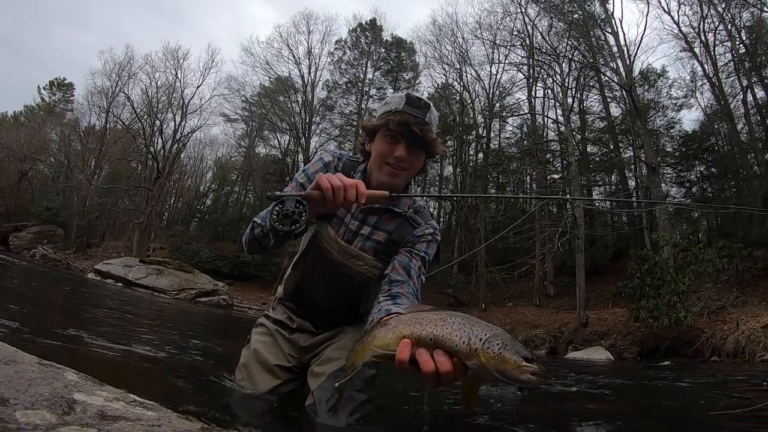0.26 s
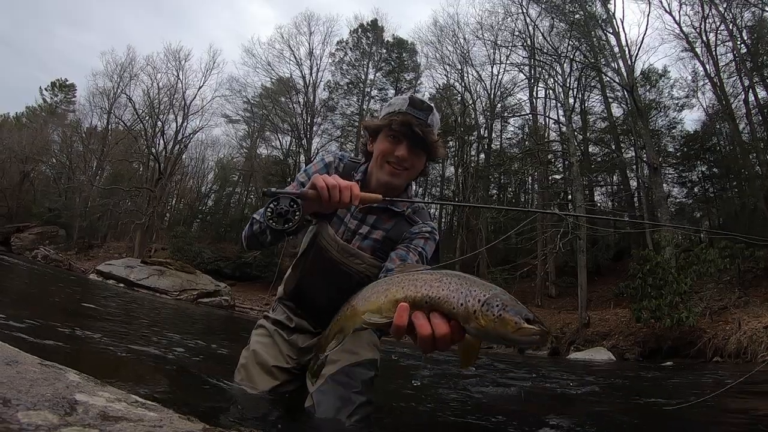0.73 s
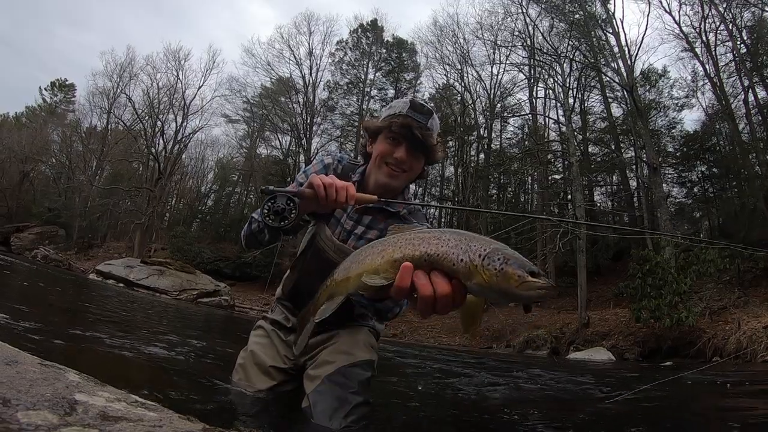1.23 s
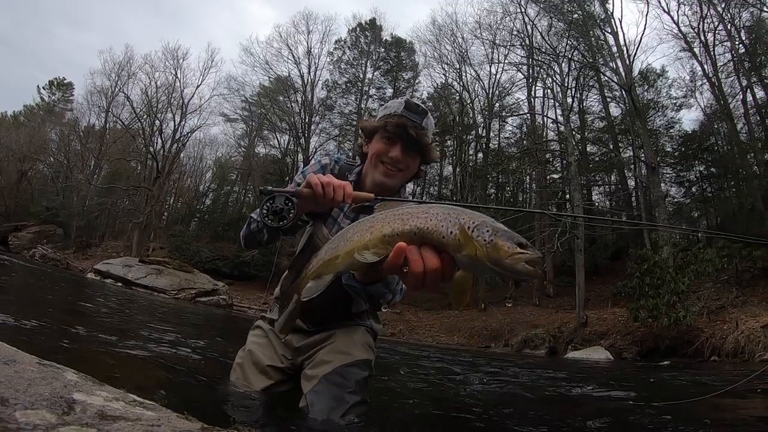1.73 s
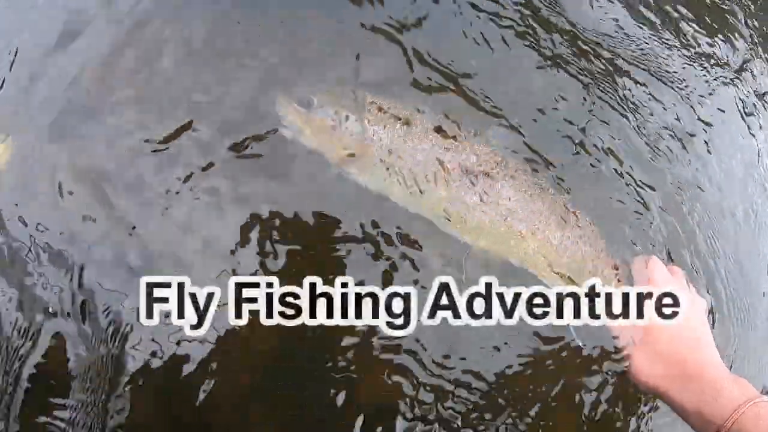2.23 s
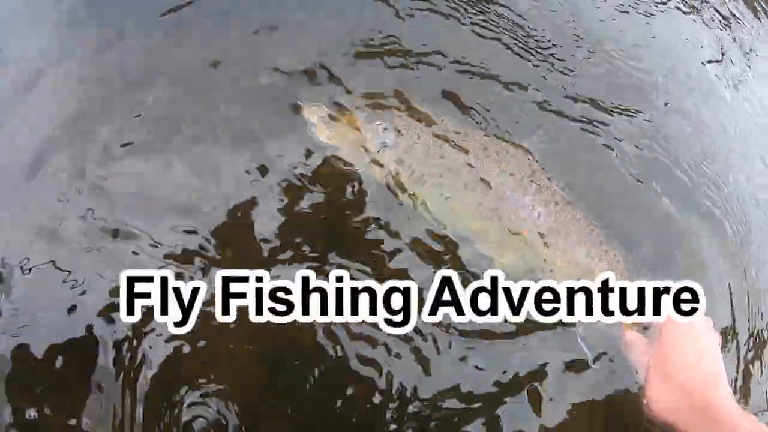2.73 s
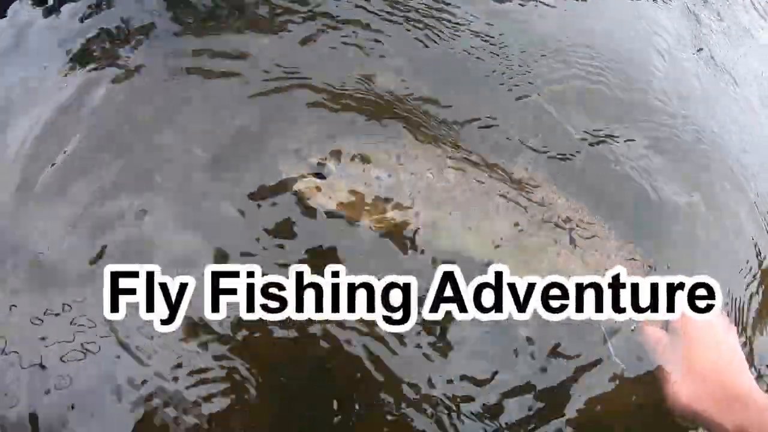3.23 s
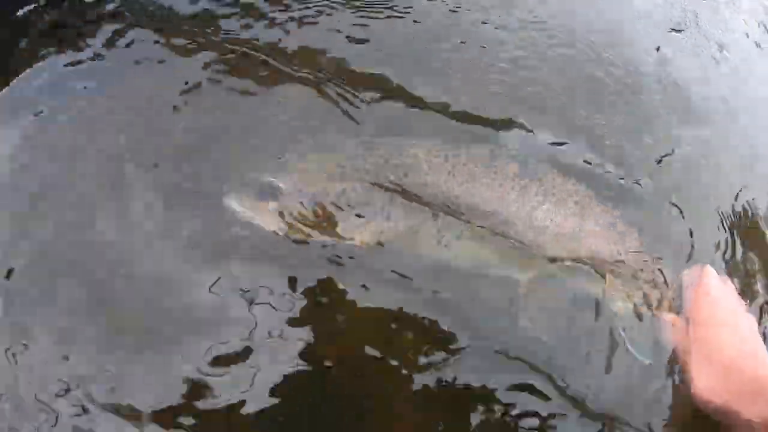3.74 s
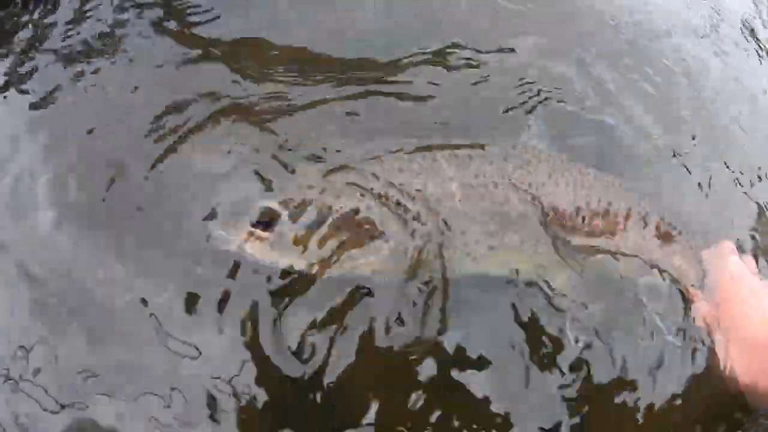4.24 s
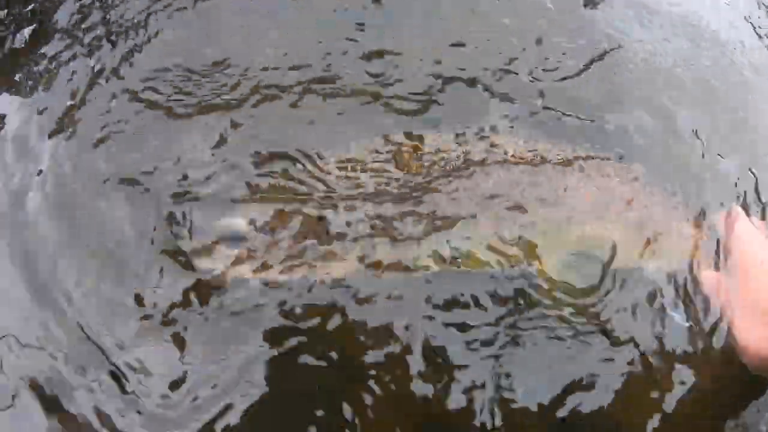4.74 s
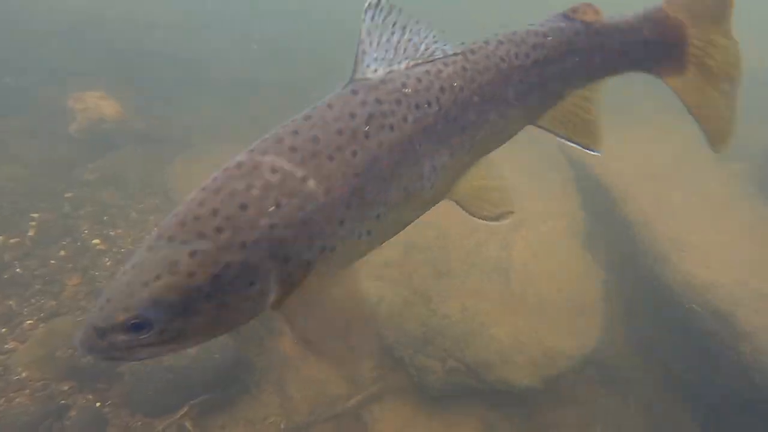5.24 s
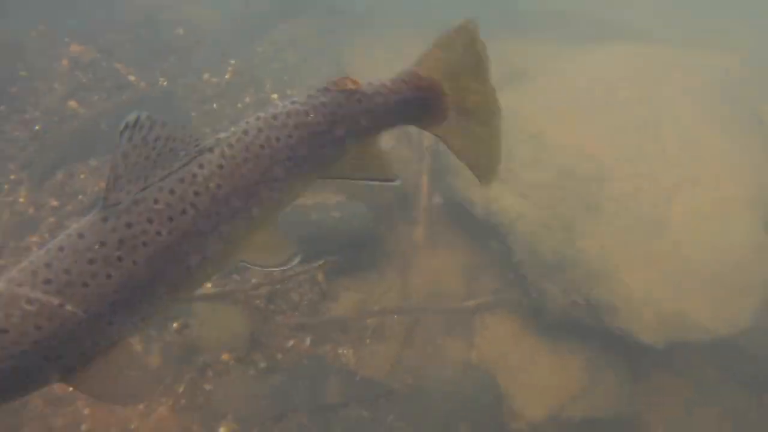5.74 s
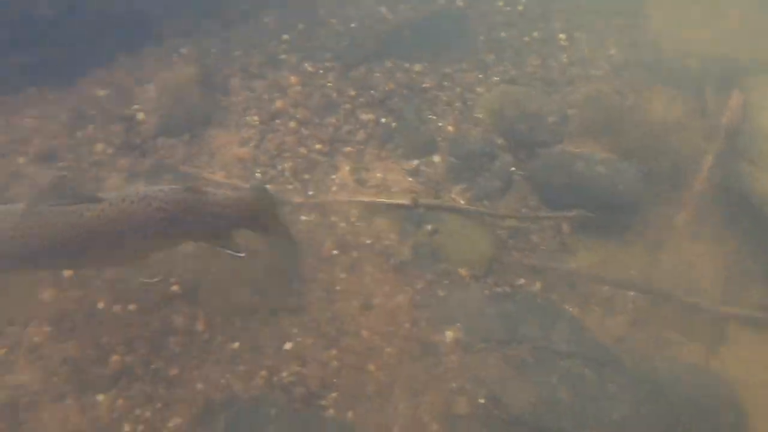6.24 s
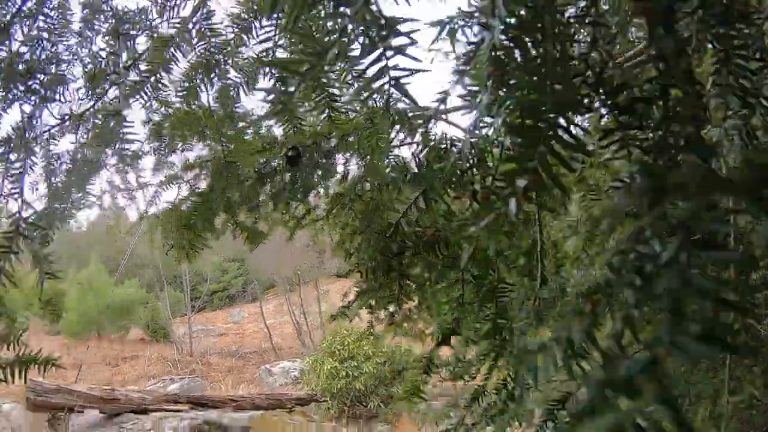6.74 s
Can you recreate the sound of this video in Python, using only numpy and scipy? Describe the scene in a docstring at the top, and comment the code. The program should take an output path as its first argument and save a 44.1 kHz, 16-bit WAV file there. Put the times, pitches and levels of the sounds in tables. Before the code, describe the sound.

From 0 to 1.8 s a stream rushes steadily, heard from the bank in wide stereo: mid-low flickering water noise, faint dull spray, occasional bubble plops and low buffeting. At 1.8 s the microphone moves close over the surface; the rush continues at a similar modest level but with brighter ticking droplets and clearer rising blips. Low handling jolts come around 2.15 and 2.6 s, with a watery plop near 2.64 s. At 4.93 s it goes under water: mono, muffled and much louder, with deep sloshing, a low hum, hollow knocks, scrapes and heavy thuds, the strongest at about 5.43 s, others near 5.8 s and a cluster from 6.2 to 6.45 s. At 6.5 s a clicking hard cut drops to quiet woodland air, where dry leaves rustle and twigs snap crisply, sharpest at 6.67 s, fading by 7 s.

```python
"""Rushing stream water, heard by a small waterproof stereo camera in four shots: from the bank, close over
the surface, under water, and in a wood. The rush is flickering noise with bubbles, spray and low buffeting.
Under water, muffled and mono, noise sloshes and flows past the housing, a resonance hums, and clicks ring
the housing as knocks among bumps and rubs. Last, dry leaves (noise) and twigs (short rings) brush the
camera over quiet air and fade out."""
import sys
import numpy as np
from scipy import signal
from scipy.fft import rfft, irfft, next_fast_len
from scipy.io import wavfile

SR = 44100
rng = np.random.default_rng(int(sys.argv[2]) if len(sys.argv) > 2 else 0)


def to_wav(sig):
    """Store sig (one row per channel, or 1-D mono) as 16-bit WAV at the path in sys.argv[1].

    Samples outside -1..1 are clipped; the rate is SR.
    """
    pcm = np.clip(np.atleast_2d(sig), -1, 1) * 32767
    pcm = np.round(pcm).astype(np.int16)
    wavfile.write(sys.argv[1], SR, pcm.T)  # frames by channels


def gain_from_decibels(decibels):
    """Convert decibel values to linear amplitude factors."""
    exponent = np.asarray(decibels, float) / 20
    return 10 ** exponent


N = 307818


def rms_one(x):
    """Scale to rms 1."""
    return x / np.sqrt(np.mean(x ** 2) + 1e-20)


def in_time(rows, start, size):
    """Columns of a curve table, sample by sample."""
    t, *columns = np.transpose(rows)
    return [np.interp(start + np.arange(size) / SR, t, column) for column in columns]


def at_hz(points, hz):
    """Read a spectrum on a log-frequency axis."""
    f, level = np.array(points).T
    return np.interp(np.log(hz), np.log(f), level)


def drift(rate, size):
    """Slow chance of spread 1: noise through a double low-pass at rate Hz, made at a twentieth of SR."""
    pole = np.exp(-40 * np.pi * rate / SR)
    noise = rng.standard_normal(size // 20 + 3002)
    slow = signal.lfilter([1], [1, -2 * pole, pole * pole], noise)[3000:]      # skip the settling
    return np.interp(np.arange(size) / 20, np.arange(len(slow)), rms_one(slow - slow.mean()))


def ring(clicks, hz, t60):
    """A resonance: a unit click sets a sine of height 1 ringing, 60 dB down after t60 seconds."""
    r, w = gain_from_decibels(-60 / (t60 * SR)), 2 * np.pi * hz / SR
    return signal.lfilter([0, np.sin(w)], [1, -2 * r * np.cos(w), r * r], clicks + 1e-18)


def clicks_at(rows, start, size, db):
    """Clicks of the given levels at the times of an event table."""
    out = np.zeros(size)
    out[np.round((np.array(rows)[:, 0] - start) * SR).astype(int)] = gain_from_decibels(db)
    return out


def add(out, sound, at):
    """Mix a sound in at a sample."""
    at = max(int(at), 0)
    out[..., at:at + sound.shape[-1]] += sound[..., :out.shape[-1] - at]


def banded(size, spectrum, alike, patchy_db, shared_db, rate, tilt_db=0, grain_db=0, treble_db=0):
    """Noise in third-octave bands that flicker apart and together, with set graininess and stereo likeness."""
    wanted, size = size, next_fast_len(size)
    tilt_db, treble_db = np.resize(tilt_db, size), np.resize(treble_db, size)
    hz = np.maximum(np.arange(size // 2 + 1) * SR / size, 1)
    like = np.clip(at_hz(alike, hz), -1, 1)
    # uneven droplets make a spiky noise
    grains = gain_from_decibels(grain_db * np.minimum(rng.exponential(1, (2, size)), 7))
    mid, side = rfft(rng.standard_normal((2, size)) * grains) * gain_from_decibels(at_hz(spectrum, hz))
    both = np.array([np.sqrt(1 + like) * mid + sign * np.sqrt(1 - like) * side for sign in (1, -1)])
    together, out, plain = drift(rate, size), 0, 0
    lowest, highest = spectrum[0][0], spectrum[-1][0]
    for centre in lowest * 2 ** np.arange(0, np.log2(highest / lowest), 1 / 3):
        band = irfft(both * np.maximum(1 - 3 * np.abs(np.log2(hz / centre)), 0), size)
        band *= gain_from_decibels(patchy_db * drift(rate, size) + shared_db * together)
        plain = plain + band
        octaves = np.clip(np.log2(centre / 1000), 0, 2.3)
        near_treble = max(1 - 2.5 * abs(np.log2(centre / 4370)), 0)      # treble_db acts around 4370 Hz
        out = out + band * gain_from_decibels(tilt_db * octaves + treble_db * near_treble)
    return out[:, :wanted] / np.sqrt(np.mean(plain ** 2))      # rms 1 before tilt and treble


def bubble(hz, t60, rise, onset=0.088):
    """A bubble swells over a share of its life, rings briefly and rises in pitch as it nears the surface."""
    t = np.arange(int(t60 * SR) + 2) / SR
    swell = np.sin(np.pi / 2 * np.minimum(t / (onset * t60), 1)) ** 2
    tone = np.sin(2 * np.pi * hz * (t + rise * t * t / t60 / 2))
    return tone * gain_from_decibels(-60 * t / t60) * swell


def gurgle(size, count, colour, low_hz, high_hz, cycles, spread_db, left_db, pan_db):
    """Countless small bubbles at random times, pitches, sizes and places; rms 1."""
    out = np.zeros((2, size))
    for at, pitch, loud, pan in rng.random((count, 4)):
        hz = low_hz * (high_hz / low_hz) ** pitch
        side_db = (left_db / 2 + pan_db * (pan - .5)) * np.array([[1], [-1]])
        gain = gain_from_decibels(at_hz(colour, hz) - spread_db * np.log(1.005 - loud) + side_db) * hz
        add(out, gain * bubble(hz, cycles / hz, 0.74), at * size)
    return rms_one(out)


# low buffeting in the microphones: f/Hz, level/dB [per Hz]
BUFFET_SPECTRUM = [(15, 6.5), (35, 0.5), (70, -5), (110, -10), (160, -26.5)]


def stream(curve, rush, alike, start, size, pan_db, spray_db, fizz_db, spray_hz, left_db):
    """Rushing water: noise, gurgling bubbles and ticking spray, with wind and handling low in the microphones."""
    water_db, tilt_db, buffet_db, treble_db = in_time(curve, start, size)
    pan_db = pan_db + 1.0 * drift(2.5, size)      # the rush shifts a little from side to side
    water = banded(size, rush, alike, 1.33, 0.81, 19.5, tilt_db, 1.0, treble_db)
    water = water * gain_from_decibels(pan_db / 2 * [[1], [-1]])
    fizz = gurgle(size, size // 250, rush, 252.5, 4070, 22, 1.84, left_db, 14)
    # droplets die within a few cycles
    spray = gurgle(size, size // 90, rush, 2000, spray_hz, 12, 4, left_db, 22)
    # distance dulls the ticks
    spray = signal.sosfilt(signal.butter(4, spray_hz, fs=SR, output="sos"), spray)
    spray *= gain_from_decibels(spray_db + 2.2 * drift(3.5, size))      # spray comes in fits
    buffet = banded(size, BUFFET_SPECTRUM, [(20, 0.3), (150, 0.92)], 3.8, 4.8, 4.7)
    return gain_from_decibels(water_db) * (water + gain_from_decibels(fizz_db) * fizz + spray) + gain_from_decibels(buffet_db) * buffet


# the rush from the bank: t/s, water level/dB, brightness [dB per octave over 1 kHz],
# buffeting level/dB, treble level/dB [around 4370 Hz]
BANK_CURVE = [
    (0.03, -40.5, 0.5, -57, 0), (0.25, -40.5, 0, -51, 0), (0.5, -41.5, 1, -58, 2.5),
    (0.87, -39.5, 1.5, -50.5, -3), (0.97, -38, 2, -59, 5.5), (1.28, -39, 3, -50.5, -1),
    (1.38, -39.5, -1, -55, -3), (1.81, -40.5, 2, -54, -2)]
# its spectrum: f/Hz, level/dB [per Hz]
BANK_SPECTRUM = [(59, -14), (100, -2), (151, -1.5), (360, 0), (565, -1.5), (2150, -22), (2360, -28),
                 (3580, -27), (4400, -38.5), (4930, -48), (6660, -54), (8040, -80), (9000, -79),
                 (11700, -110), (19800, -120)]
# its stereo spread: f/Hz, left-right likeness [-1 to 1]
BANK_LIKENESS = [(60, 0.89), (150, 1), (380, 0.15), (950, 0.16), (2380, -0.12), (5980, -0.34),
                 (15000, -0.05)]


def from_bank(start, size):
    """The stream from the bank: distance leaves only faint, dulled spray ticks in the rush."""
    return stream(BANK_CURVE, BANK_SPECTRUM, BANK_LIKENESS, start, size,
                  pan_db=-2, spray_db=-28, fizz_db=-9.5, spray_hz=4730, left_db=-6.0)


# single bubbles and drops: t/s, peak level/dB, starting f/Hz, cycles until 60 dB down, left-right level/dB
PLOP_EVENTS = [(0.3515, -39, 1430, 33, -20), (0.369, -30.5, 2970, 13, -15), (0.453, -38.5, 3520, 60, -17),
               (0.548, -40.5, 2240, 21, -15), (0.7027, -38, 2660, 29, -5), (0.7366, -48, 5800, 33, 5),
               (0.856, -37, 2440, 30, -12), (0.9687, -42, 3420, 32, -20), (1.3674, -32, 950, 22, 5.5),
               (1.468, -36, 2150, 22, -5), (1.66, -40.5, 2850, 29, -14), (1.773, -30.5, 207, 24, -4),
               (1.888, -32, 1376, 66, 0.5), (1.9366, -30.5, 2650, 15, 0), (2.065, -27, 482, 59, -1),
               (2.229, -28.5, 485, 14, -0.5), (2.2498, -48, 10100, 27.5, 0.5), (2.328, -36, 2800, 30, 0.5),
               (2.6394, -28.5, 1050, 27, -3.5), (2.6397, -17.5, 1960, 4.5, -6), (2.7358, -33, 2160, 37, 19),
               (2.7373, -39, 7400, 33, -1), (2.7527, -48, 10100, 30, 4), (2.8378, -37, 6100, 27, -0.5),
               (2.89, -36.5, 3100, 37, 11), (2.9687, -51, 10300, 31, 1.5), (2.9853, -37.5, 7050, 22, 9.5),
               (2.9958, -29.5, 3160, 19, 8), (3.0021, -51, 10100, 29.5, -5), (3.079, -36, 6300, 24, -2),
               (3.1818, -37.5, 7100, 42, -3), (3.253, -40, 7760, 24, -0.5), (3.3852, -30.5, 1780, 38, 0.5),
               (3.6148, -40, 6350, 22, 0), (4.0768, -35.5, 2640, 36, 0), (4.19, -34, 3320, 33, 1),
               (4.21, -36, 6240, 24, -1), (4.219, -32.5, 2320, 44, 14), (4.3826, -41, 6260, 23, -0.5),
               (4.5667, -37, 6500, 24, -1.5), (4.5776, -34, 2450, 25, 1), (4.8428, -30.5, 6860, 25, 1),
               (4.855, -33, 1100, 44, 12)]


def plops():
    """Single bubbles and drops that stand out of the rush, each a short rising ring."""
    out = np.zeros((2, N))
    for t, db, hz, cycles, pan_db in PLOP_EVENTS:
        sides_db = np.array([[pan_db], [-pan_db]]) / 2
        add(out, gain_from_decibels(db + sides_db) * bubble(hz, cycles / hz, 0.11, 0.1), t * SR)
    return out


# the rush close over the surface: t/s, water level/dB, brightness [dB per octave over 1 kHz],
# buffeting level/dB, treble level/dB [around 4370 Hz]
CLOSE_CURVE = [
    (1.79, -43, 0, -62, 13), (2.11, -43.5, 0, -48, 8.5), (2.36, -44, 1.5, -57, 4.5),
    (2.62, -42.5, 2.5, -52, 2), (3.07, -41.5, 1.5, -54, -0.5), (3.55, -42.5, 2, -53, -2.5),
    (4.35, -41, 2.5, -52, -1.5), (4.8, -42, 3, -51, -5), (4.95, -42, 3, -38, -5)]
# its spectrum: f/Hz, level/dB [per Hz]
CLOSE_SPECTRUM = [(59, -33), (100, -35), (123, -14.5), (166, 0), (253, -2), (467, -0.5), (682, -4.5),
                  (898, -3.5), (1290, -6), (3120, -22), (4960, -33), (7410, -33), (10400, -52.5),
                  (15500, -72)]
# its stereo spread: f/Hz, left-right likeness [-1 to 1]
CLOSE_LIKENESS = [(60, 0.67), (130, 0.96), (290, 1), (640, 0.84), (1410, 0.44), (3100, 0.75), (6820, 0.019),
                  (15000, 0.09)]


def over_surface(start, size):
    """The stream close over the surface: the spray ticks are nearer, brighter and stronger in the rush."""
    return stream(CLOSE_CURVE, CLOSE_SPECTRUM, CLOSE_LIKENESS, start, size,
                  pan_db=-0.7, spray_db=-18.5, fizz_db=-9.0, spray_hz=14000, left_db=0)


# the hand jolts the camera: t/s, peak level/dB, f/Hz
JOLT_EVENTS = [(2.123, -30, 63.6), (2.148, -17.5, 70.5), (2.246, -35.5, 65), (2.567, -27.5, 73),
               (2.597, -32, 68), (2.818, -35.5, 69.5), (4.077, -37, 49.5)]


def jolts():
    """The hand jolts the camera: low tones that sink slightly in pitch and die in 0.1 s."""
    out = np.zeros(N)
    for t, db, hz in JOLT_EVENTS:
        add(out, gain_from_decibels(db) * bubble(hz, 0.1, -0.096, 0.054), t * SR)
    return out


# water dragging at the microphone: f/Hz, level/dB [per Hz]
SLOSH_SPECTRUM = [(8, -8.5), (18, 8), (32, -2), (50, -11.5), (70, -34.5)]
# one microphone signal on both sides: f/Hz, left-right likeness
MONO_LIKENESS = [(10, 1), (20000, 1)]
SLOSH_TOP = 0.25      # limit of the diaphragm's travel, full scale = 1


def slosh(size, slosh_db):
    """Water drags at the sealed housing: deep noise, limited by the diaphragm's travel."""
    pressure = gain_from_decibels(slosh_db) * banded(size, SLOSH_SPECTRUM, MONO_LIKENESS, 0.94, 0.94, 6.8)[0]
    return SLOSH_TOP * np.tanh(pressure / SLOSH_TOP)


HUM_HZ, HUM_WIDTH_HZ = 90, 46


def hum(size, hum_db):
    """The housing hums: fitful noise through two equal-pitched resonances."""
    noise = rng.standard_normal(size) * gain_from_decibels(5.7 * drift(18, size))
    once = ring(noise, HUM_HZ, 1.2 / HUM_WIDTH_HZ)
    return gain_from_decibels(hum_db) * rms_one(ring(once, HUM_HZ, 1.1 / HUM_WIDTH_HZ))


# flow past the housing: f/Hz, level/dB [per Hz]
FLOW_SPECTRUM = [(120, -26.5), (170, -0.5), (320, -8.5), (450, -15), (700, -28), (1000, -44.5)]


def flow(size, rub):
    """The flow past the housing is steady and swells while the housing is rubbed."""
    level = gain_from_decibels(-49.5) + gain_from_decibels(4) * rub      # the rub's share is 4 dB over the rub itself
    return level * banded(size, FLOW_SPECTRUM, MONO_LIKENESS, 6.0, 0.69, 6.7)[0]


# heavy bumps: t/s, peak level/dB, f/Hz, t60/s
THUD_EVENTS = [(5.007, -18.5, 98, 0.14), (5.04, -15.5, 96, 0.14), (5.228, -13.5, 79.3, 0.12),
               (5.346, -17.5, 90, 0.11), (5.412, -10, 80, 0.067), (5.431, 0.5, 89.5, 0.092),
               (5.681, -28, 90, 0.19), (5.81, -12.5, 75.3, 0.14), (5.838, -31, 71, 0.11),
               (6.3, -18, 70, 0.1), (6.347, -14, 70.7, 0.13), (6.405, -13, 79.4, 0.18)]


def thuds(start, size):
    """Heavy bumps on the housing: low tones of steady pitch with a soft onset."""
    out = np.zeros(size)
    for t, db, hz, t60 in THUD_EVENTS:
        add(out, gain_from_decibels(db) * bubble(hz, t60, 0, 0.039), (t - start) * SR)
    return out


# rubbing along the housing: t/s, hold/s, level/dB, brightness [dB per octave over 1 kHz]
RUB_EVENTS = [(5.018, .025, -51.5, -20), (5.161, .02, -71.5, -4), (5.366, .035, -56, 5),
              (5.41, .02, -43, -14), (5.573, .075, -49.5, 2.5), (5.66, .04, -55.5, -16),
              (5.783, .03, -63, -0.5), (6.045, .015, -75, -5), (6.2, .03, -66, 8), (6.33, .05, -69, -5),
              (6.41, .035, -64.5, 4)]


def rubbing(start, size):
    """Each rub rises, holds and falls; gives level and brightness over a faint steady drag."""
    floor_db, rise_db_per_s, fall_db_per_s = -73, 702.5, 598.5
    t = start + np.arange(size) / SR
    begin, hold, db, tilt_db = np.transpose(RUB_EVENTS)[..., None]
    before_db = rise_db_per_s * np.maximum(begin - t, 0)
    after_db = fall_db_per_s * np.maximum(t - begin - hold, 0)
    each = gain_from_decibels(db - before_db - after_db)
    level = each.sum(axis=0) + gain_from_decibels(floor_db)
    return level, (each * tilt_db).sum(axis=0) / level


# scraping and rattling of the housing: f/Hz, level/dB [per Hz]
SCRAPE_SPECTRUM = [(400, -8.5), (600, -3), (1000, -13.5), (1200, -23), (1600, -15.5), (1850, -20.5),
                   (2100, -48)]


def scrape(size, rub, bright_db):
    """Rubbing makes rough, fast-flickering noise in the housing."""
    return rub * banded(size, SCRAPE_SPECTRUM, MONO_LIKENESS, 2.4, 4.6, 40, bright_db)[0]


# knocks on the housing: t/s, level/dB, brightness [dB per octave], air pocket f/Hz,
# air pocket level/dB [over the knock]
KNOCK_EVENTS = [(5.024, -22.5, 2.5, 400, 0), (5.031, -43.5, -4, 700, 17.5), (5.211, -59.5, 7, 700, 1),
                (5.362, -42, -3, 1080, -4), (5.385, -22, 4.5, 440, -2.5), (5.401, -43.5, 0, 926, 5),
                (5.4238, -12.5, -1, 300, -5), (5.683, -33, -4, 870, -8.5), (5.805, -13, -9, 593, -9.5),
                (5.844, -45, 8, 1007, -10), (6.029, -44.5, 4.5, 815, -4), (6.16, -28.5, -9, 1455, -18.5),
                (6.199, -32, 1, 500, -2), (6.273, -32, 5, 700, 3.5), (6.31, -38, -5, 1700, -21.5),
                (6.353, -39, 8, 1250, -5), (6.375, -26, 2, 496, -3), (6.389, -28.5, 6, 616, 8.5),
                (6.414, -37, 3.5, 1310, -7), (6.429, -30, 4.5, 490, 1)]
# resonances of the housing: f/Hz, level/dB, t60/s
HOUSING_MODES = [(188, -8.5, 0.024), (352.5, -1.5, 0.036), (440, -2, 0.039), (700, -12, 0.0031),
                 (965, -18, 0.023), (1250, -21, 0.015), (1560, -20.5, 0.011)]


def knocks(start, size):
    """Each blow rings the housing, treble first, shakes a trapped air pocket and rattles on for a moment."""
    times, db, tilt_db, pocket_hz, pocket_db = np.transpose(KNOCK_EVENTS)
    out = np.zeros(size)
    luck = rng.normal(0, 2, (len(times), len(HOUSING_MODES)))      # each blow lands on another spot
    for k, (hz, mode_db, t60) in enumerate(HOUSING_MODES):
        level_db = db + mode_db + luck[:, k] + tilt_db * np.log2(hz / 440)
        clicks = clicks_at(KNOCK_EVENTS, start, size, level_db)
        # bending waves are slower the lower they are: a late, soft arrival
        lag_s = 0.0051 * (np.sqrt(500 / hz) - .38)
        swell = np.hanning(int(2 * lag_s * SR) + 3)
        tone = swell * np.cos(2 * np.pi * hz * np.arange(len(swell)) / SR) * 2 / swell.sum()
        out += ring(np.convolve(clicks, tone)[:size], hz, t60)
    for t, hz, level_db in zip(times, pocket_hz, db + pocket_db):
        add(out, gain_from_decibels(level_db) * bubble(hz, 0.033, 0.055), (t + .002 - start) * SR)
    blows = clicks_at(KNOCK_EVENTS, start, size, db + tilt_db - 33.0)
    dying = signal.lfilter([1], [1, -gain_from_decibels(-60 / (.06 * SR))], blows)      # the rattle is 60 dB down in 0.06 s
    out += dying * banded(size, SCRAPE_SPECTRUM, MONO_LIKENESS, 3.0, 2.0, 60, 2.7)[0]
    # a knock also starts the hum, which follows only a small share of the knock's dB
    lows = clicks_at(KNOCK_EVENTS, start, size, -32 + 0.079 * db)
    return out + ring(signal.sosfilt(signal.butter(2, 200, fs=SR, output="sos"), lows), HUM_HZ, 0.27)


# crackle: f/Hz, level/dB [per Hz]
CRACKLE_SPECTRUM = [(1500, 4.5), (3000, -11.5), (5000, -16.5), (8000, -28.5)]


def crackle(size, swing):
    """A faint crackle rides on the widest swings, growing with their square."""
    strain = (swing / SLOSH_TOP) ** 2
    return gain_from_decibels(-71) * strain * banded(size, CRACKLE_SPECTRUM, MONO_LIKENESS, 2.2, 4.5, 120)[0]


# under water: t/s, slosh level/dB, hum level/dB
DIVE_CURVE = [(4.925, -13, -68), (4.975, -14, -60), (5.02, -23, -50), (5.09, -16.5, -33.5),
              (5.135, -28, -33), (5.175, -6, -27.5), (5.24, -25, -24.5), (5.29, -17.5, -35),
              (5.35, -7.5, -26), (5.41, -19.5, -35), (5.5, -34.5, -35), (5.64, -30.5, -29.5),
              (5.71, -26, -25), (5.76, -15.5, -29), (5.87, -26.5, -32), (5.965, -17.5, -34.5),
              (6.07, -24, -37.5), (6.25, -27, -27.5), (6.315, -16, -31.5), (6.39, -26, -42),
              (6.51, -15, -59.5)]
# a faint, steady noise floor in the treble during the dive: f/Hz, level/dB [per Hz]
DIVE_HISS_SPECTRUM = [(1500, 6.5), (3000, -11), (5000, -13), (8000, -22)]


def under_water(start, size):
    """Water drags past the sealed housing; it hums, is knocked and rubbed; little above 2 kHz gets in."""
    slosh_db, hum_db = in_time(DIVE_CURVE, start, size)
    rub, bright_db = rubbing(start, size)
    out = slosh(size, slosh_db) + hum(size, hum_db) + flow(size, rub)
    out += thuds(start, size) + scrape(size, rub, bright_db) + knocks(start, size)
    out = signal.sosfilt(signal.cheby2(8, 50, 2300, fs=SR, output="sos"), out)
    out += crackle(size, out)
    out += gain_from_decibels(-97) * banded(size, DIVE_HISS_SPECTRUM, MONO_LIKENESS, 3.0, 2.0, 20)[0]
    # the cut falls in the middle of a swing, at a pressure of 0.076: it clicks
    swing = np.exp((np.arange(size) - size) / (0.0068 * SR))
    out += (0.076 - out[-1]) * swing
    tailed = np.append(out, np.zeros(200))      # room for the filter to ring out
    return signal.sosfilt(signal.cheby2(10, 60, 11400, fs=SR, output="sos"), tailed)


# dry leaves brushing the camera: f/Hz, level/dB [per Hz]
RUSTLE_SPECTRUM = [(1500, -8), (2600, -16.5), (4200, 1.5), (5900, -3), (7300, 1.5), (9000, -7.5),
                   (11400, -3), (13500, -13), (15600, -31.5)]
# twigs: t/s, level/dB, brightness [dB per octave]
SNAP_EVENTS = [(6.5234, -43.5, 0), (6.5541, -38, 8), (6.6645, -29.5, 1), (6.6708, -28.5, 0),
               (6.7143, -42.5, -6.5), (6.816, -48, -10), (6.8827, -58, 0), (6.9134, -62, 8),
               (6.9279, -62, -7)]


def snaps(start, size):
    """Twigs snap: nine short resonances, each set off at its own moment within 2 ms."""
    out = np.zeros(size)
    _, db, tilt_db = np.transpose(SNAP_EVENTS)
    for hz in np.geomspace(2500, 13000, 9):
        luck = rng.normal(0, 3, len(db))
        level_db = db - 4.0 + at_hz(RUSTLE_SPECTRUM, hz) + luck + tilt_db * np.log2(hz / 6000)
        late = rng.uniform(0, 0.002)      # a snap is a quick tearing, not one click
        out += ring(clicks_at(SNAP_EVENTS, start - late, size, level_db), hz, 0.0043)
    return out


# the wood: t/s, rustle level/dB, air level/dB
WOOD_CURVE = [(6.507, -81.5, -60), (6.522, -53.5, -67), (6.58, -53, -59), (6.63, -45, -60),
              (6.655, -59, -56), (6.697, -44, -54.5), (6.715, -52.5, -58), (6.78, -58.5, -57),
              (6.797, -73.5, -64), (6.815, -63, -58), (6.828, -79, -59.5), (6.98, -83, -64.5)]
# quiet air: f/Hz, level/dB [per Hz]
AIR_SPECTRUM = [(15, -39), (30, -5), (96, -6), (224, -2.5), (400, -9.5), (900, -9.5), (2100, -15.5),
                (4600, -20), (5600, -32.5), (8000, -78)]
# stereo spread in the wood: f/Hz, left-right likeness [-1 to 1]
WOOD_LIKENESS = [(100, 1), (6000, 1), (10500, 0.9), (12000, 0.34), (15000, .3)]


def wood(start, size):
    """Dry leaves, as grainy treble noise, and twigs brush the camera over quiet air."""
    rustle_db, air_db = in_time(WOOD_CURVE, start, size)
    rustle = banded(size, RUSTLE_SPECTRUM, WOOD_LIKENESS, 2.4, 1.0, 68, grain_db=1.4)
    air = banded(size, AIR_SPECTRUM, WOOD_LIKENESS, 1.65, 0.53, 2.8)
    return gain_from_decibels(rustle_db) * rustle + gain_from_decibels(air_db) * air + snaps(start, size)


# starts of the four shots: t/s
SHOT_STARTS = [.036, 1.80, 4.929, 6.5073]


def scene():
    """The shots in a row: short cross-fades, then a hard cut into the wood."""
    out = plops() + jolts()
    first, second, third, fourth = [round(t * SR) for t in SHOT_STARTS]
    lap = round(.016 * SR)
    fade = np.sin(np.linspace(0, np.pi / 2, lap))
    bank = from_bank(first / SR, second + lap - first)
    close = over_surface(second / SR, third + lap - second)
    dive = under_water(third / SR, fourth - third)
    leaves = wood(fourth / SR, N - fourth)
    for shot in (bank, close, dive):
        shot[..., :lap] *= fade
    for shot in (bank, close):
        shot[..., -lap:] *= fade[::-1]
    for shot, at in ((bank, first), (close, second), (dive, third), (leaves, fourth)):
        add(out, shot, at)
    return out


def band_limit(x):
    """A steep low-pass at the top of the band."""
    return signal.sosfilt(signal.butter(12, 15720, fs=SR, output="sos"), x)


def record(dry):
    """The hardest bump meets a soft ceiling at 0.8 of full scale."""
    ceiling = 0.8
    mix = dry / (1 + (dry / ceiling) ** 6) ** (1 / 6)
    return band_limit(mix)


dry = scene()
out = record(dry)
to_wav(out)
```